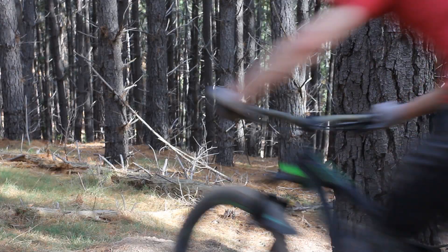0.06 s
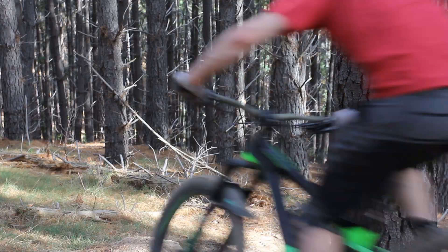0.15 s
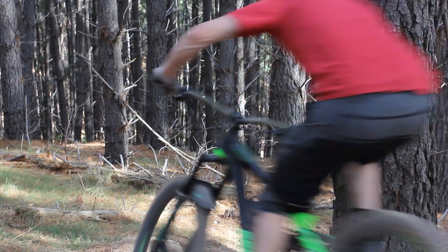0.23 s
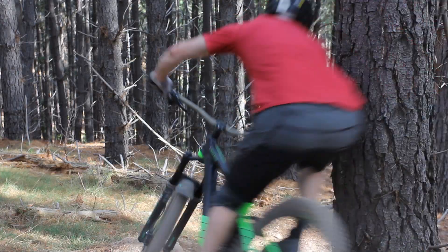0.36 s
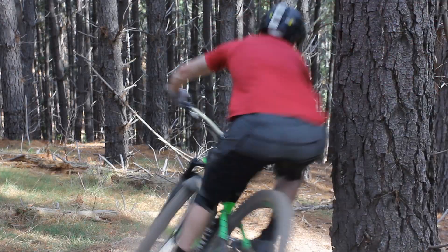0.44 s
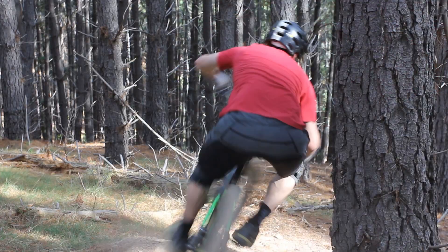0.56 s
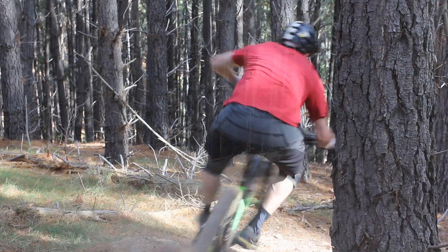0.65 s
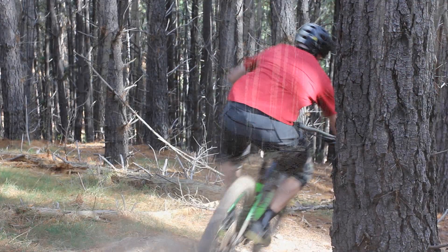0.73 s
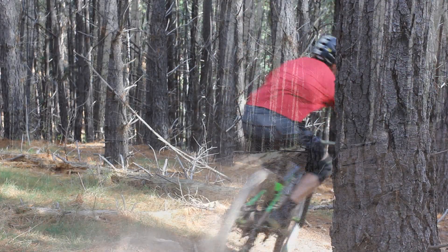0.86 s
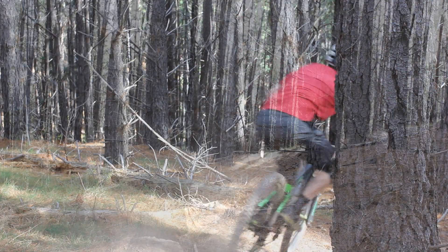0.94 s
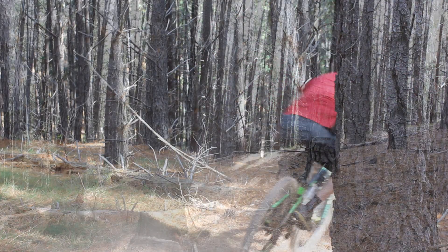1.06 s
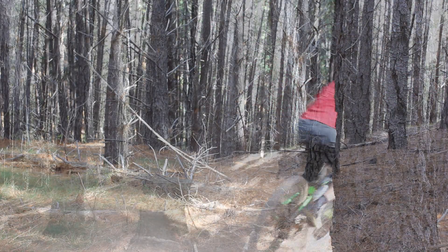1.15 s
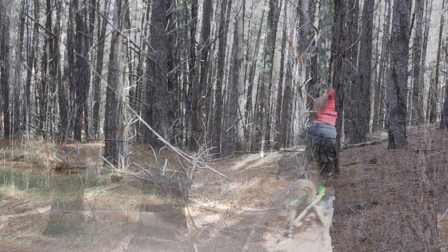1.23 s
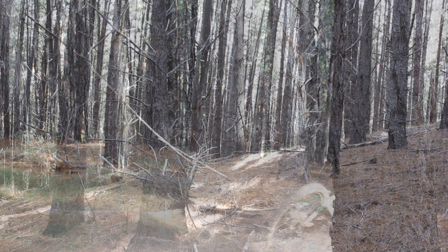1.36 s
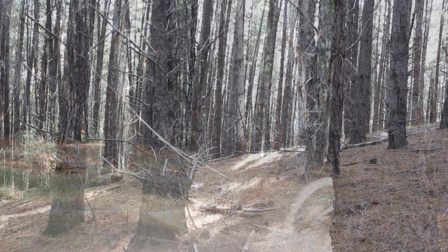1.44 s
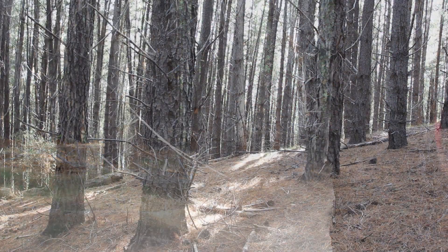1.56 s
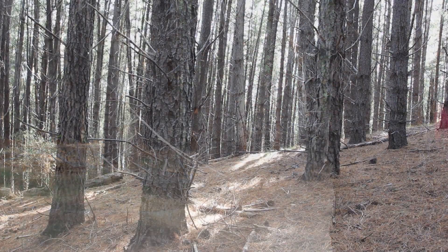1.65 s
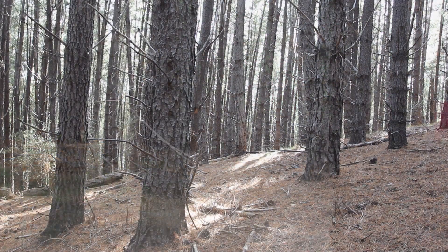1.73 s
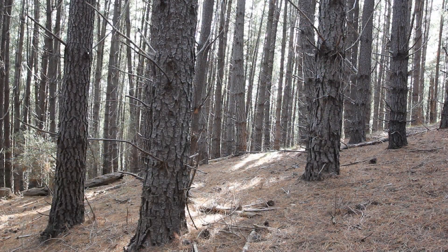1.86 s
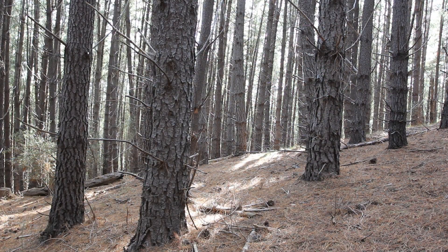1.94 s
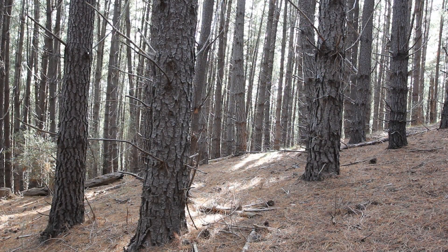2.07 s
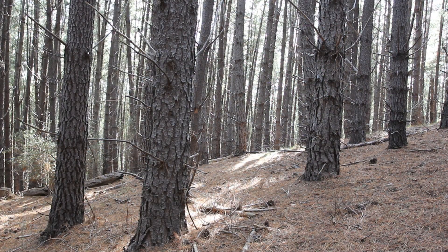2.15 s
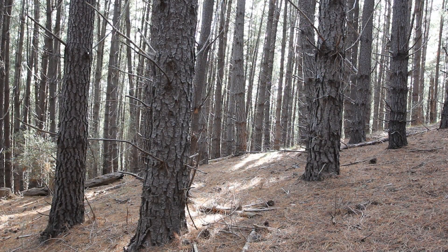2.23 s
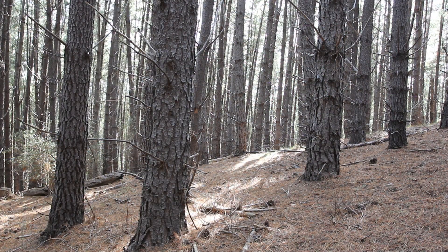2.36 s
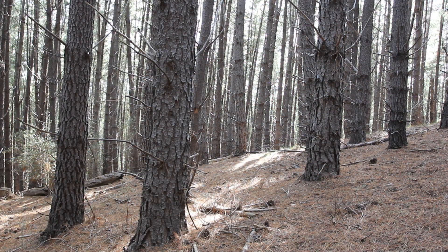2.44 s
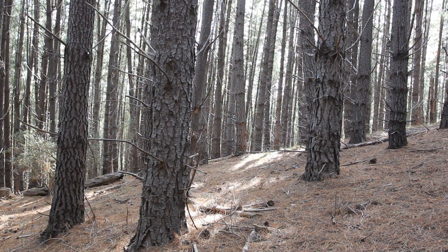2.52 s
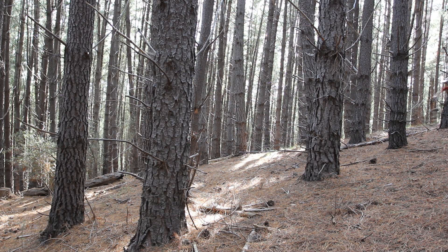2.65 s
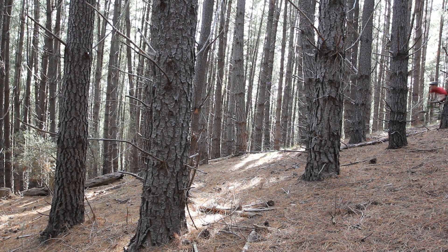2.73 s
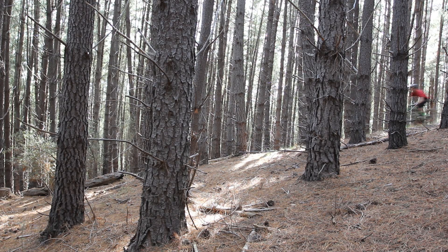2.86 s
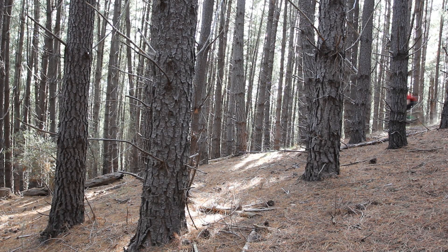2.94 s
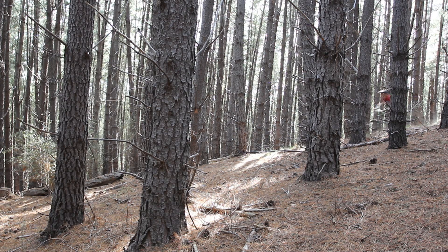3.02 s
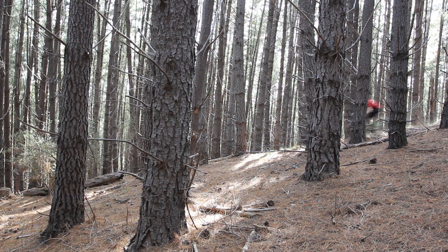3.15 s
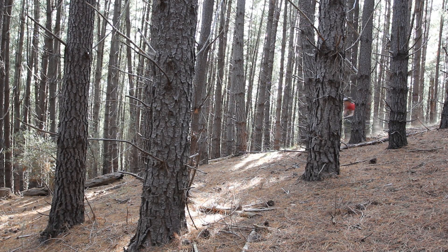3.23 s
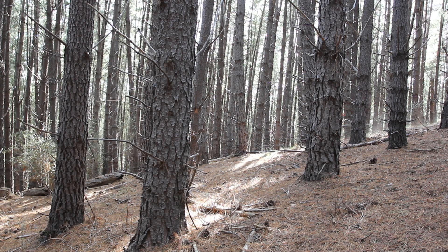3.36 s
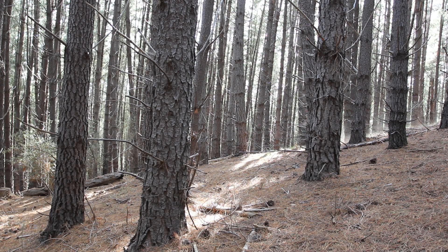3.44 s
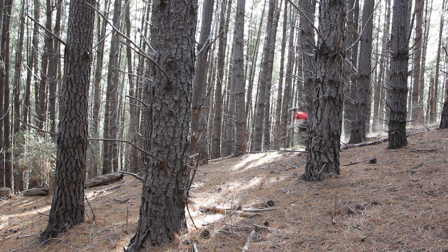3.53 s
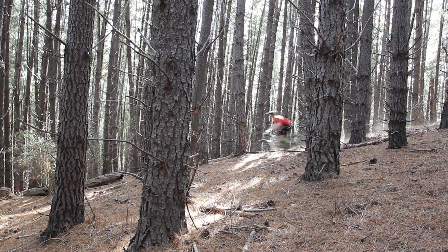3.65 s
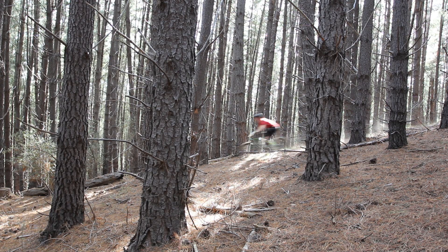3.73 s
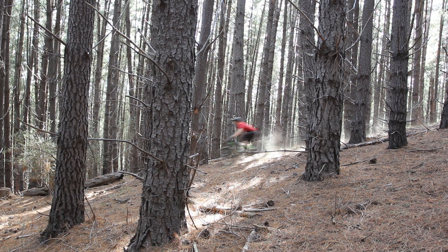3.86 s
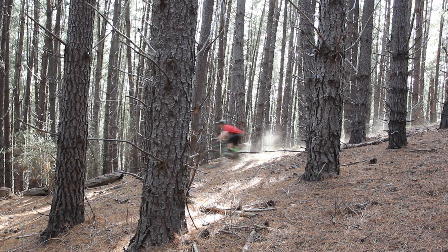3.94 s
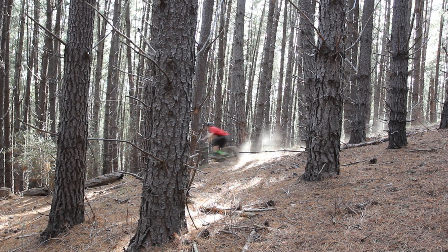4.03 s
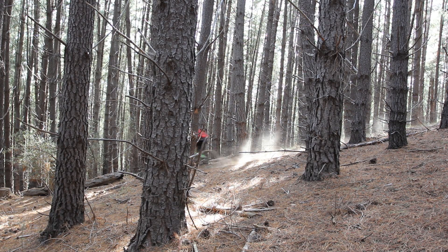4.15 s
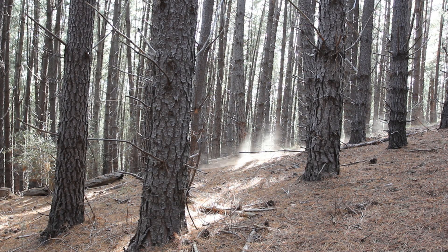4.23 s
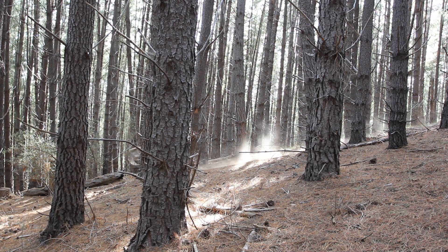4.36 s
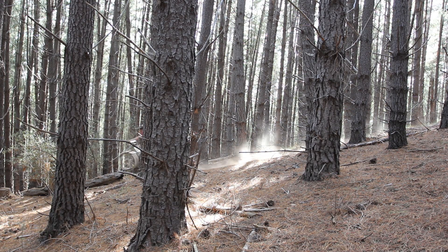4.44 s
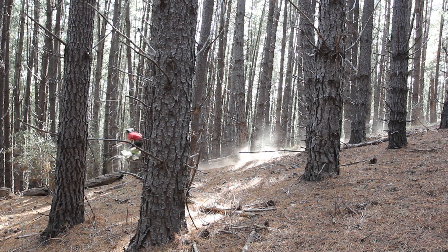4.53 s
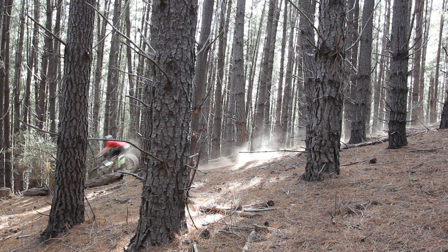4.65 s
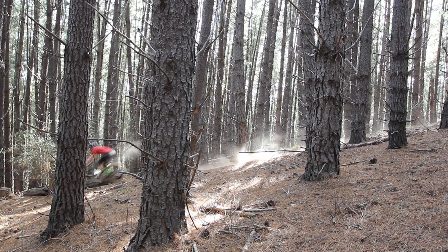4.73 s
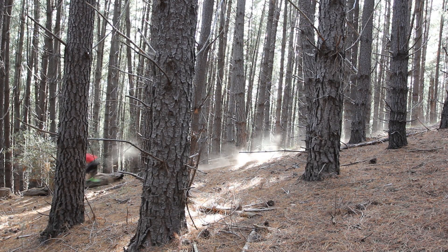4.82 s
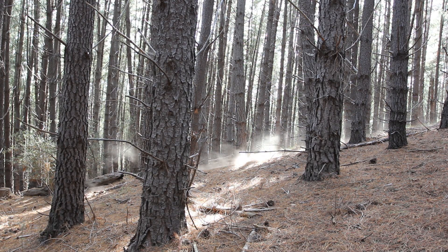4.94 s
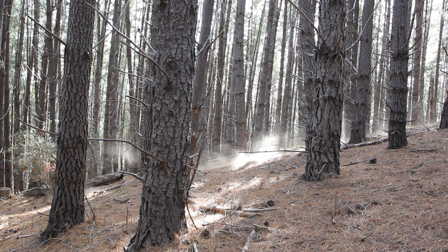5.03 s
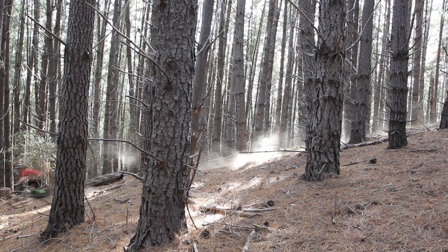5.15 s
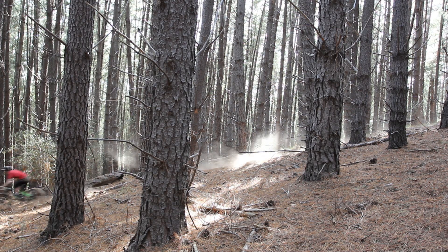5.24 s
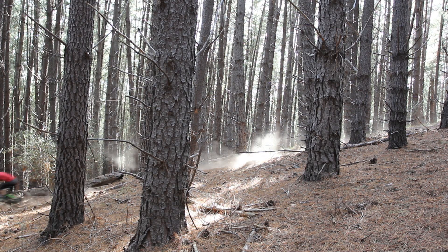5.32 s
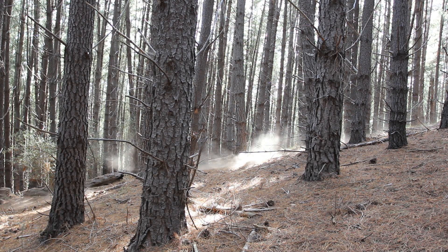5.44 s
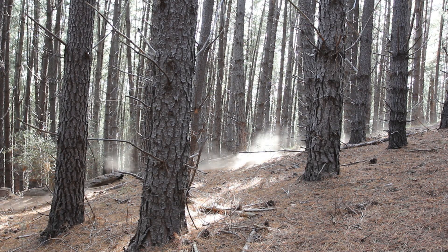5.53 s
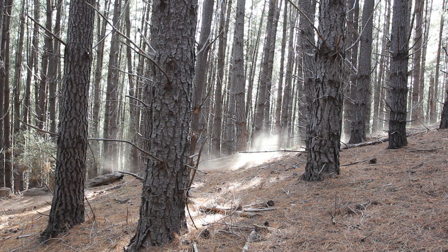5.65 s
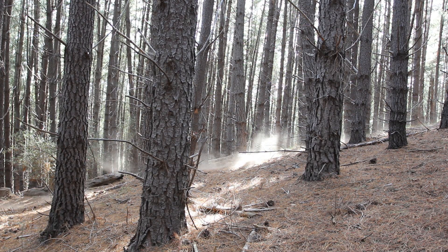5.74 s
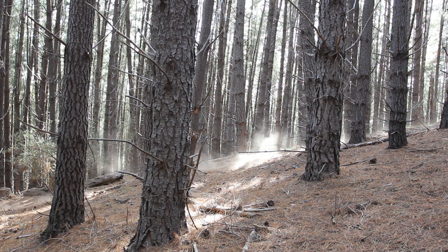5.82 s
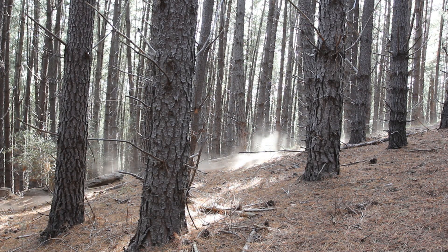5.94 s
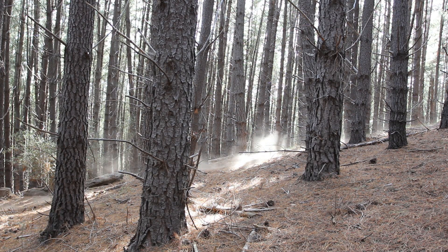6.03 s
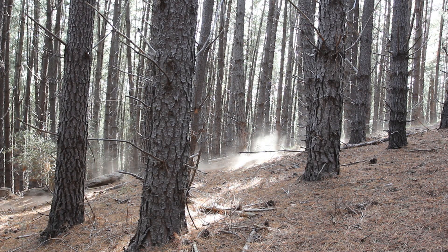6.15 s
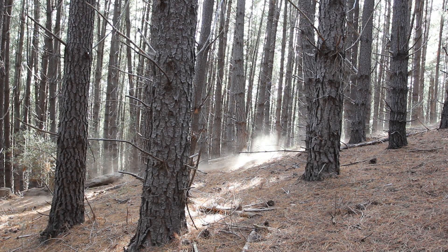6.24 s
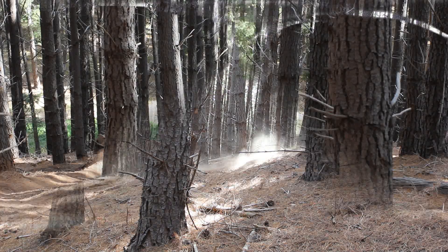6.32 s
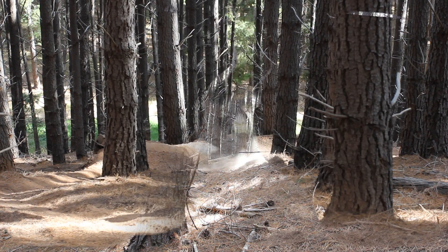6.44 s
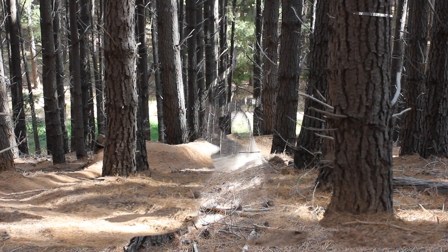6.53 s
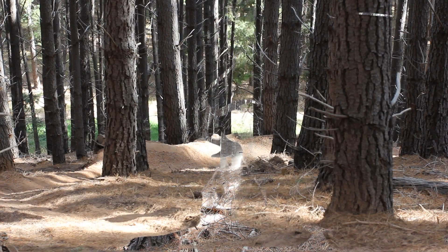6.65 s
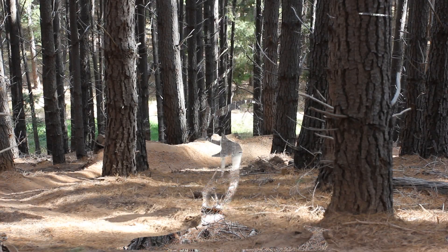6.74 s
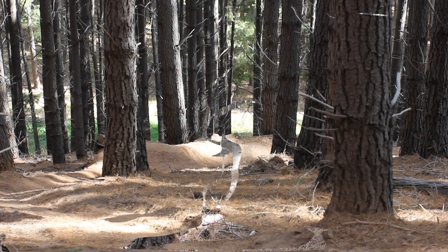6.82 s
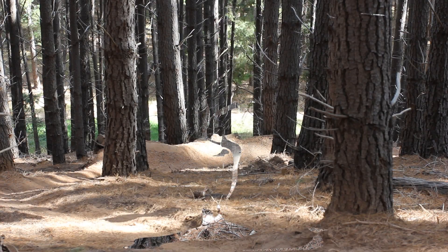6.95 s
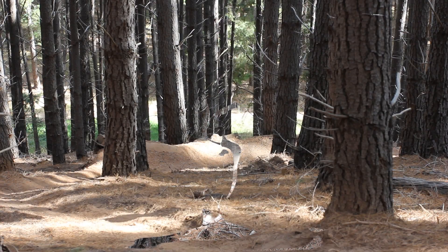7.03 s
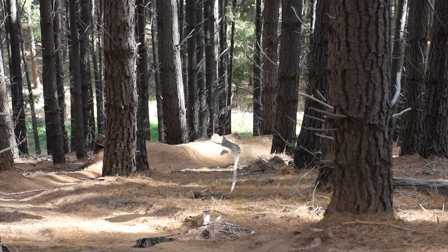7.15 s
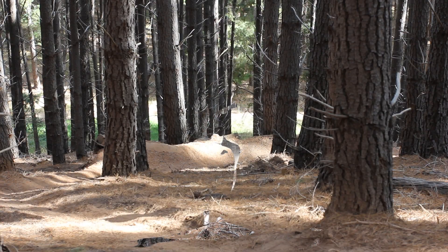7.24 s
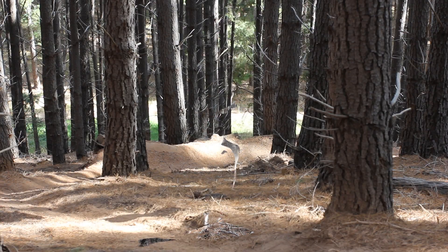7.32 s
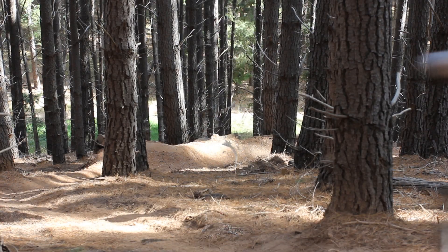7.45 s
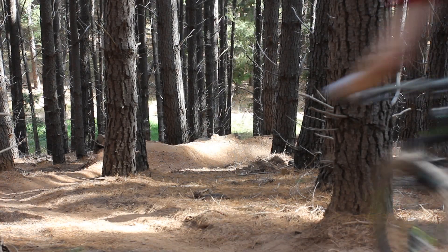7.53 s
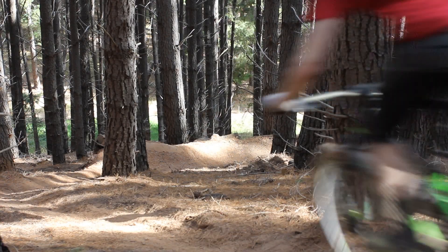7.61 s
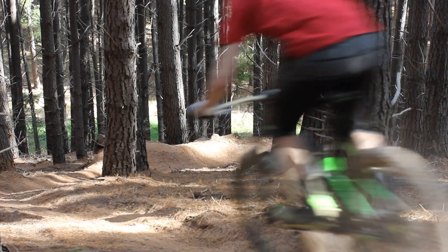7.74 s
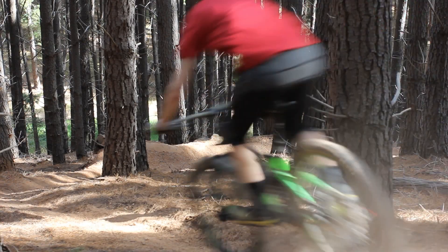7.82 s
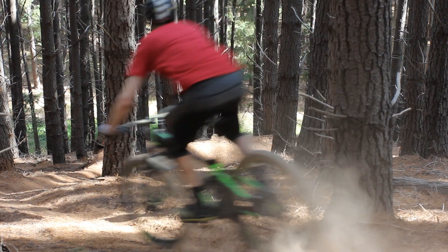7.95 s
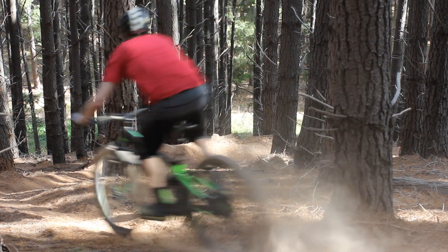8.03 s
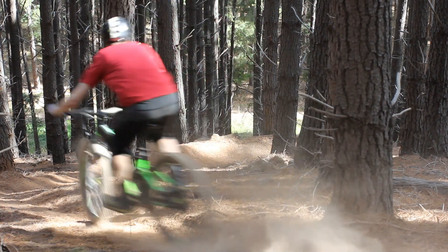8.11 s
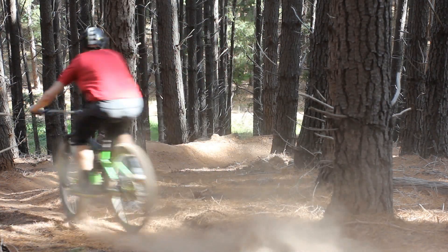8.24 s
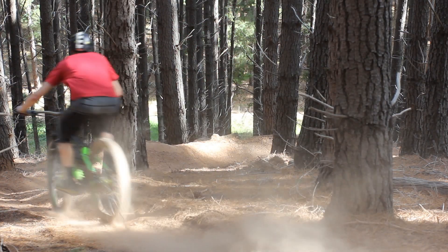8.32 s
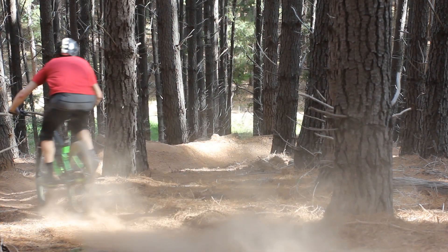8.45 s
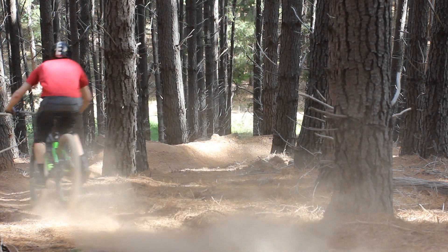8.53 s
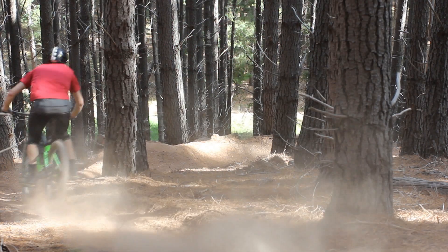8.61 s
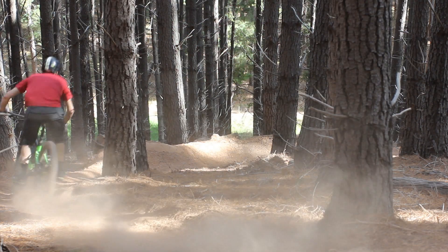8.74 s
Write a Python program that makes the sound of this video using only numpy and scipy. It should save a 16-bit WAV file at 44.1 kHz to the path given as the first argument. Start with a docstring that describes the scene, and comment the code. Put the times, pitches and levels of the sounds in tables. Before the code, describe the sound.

Knobby tyres crunch and spray grit through a dusty forest in three passes, near, distant and near, with hub clicks, chain rattles and light wind.

```python
"""Mountain bike on a dusty forest trail

Heard from three spots joined by hard cuts: near, far, near again. Tyres roll as grainy noise and crunch into
roots and stones in bursts of grit; pebbles ping as damped tones. Chain slaps are noise through resonances,
and the freehub ticks by ringing its shell at every tooth, mostly while the rider coasts. Wind noise and bumps
reach the microphone over a steady forest hush; the trunks return a short diffuse echo of the knocks.
"""
import sys
import numpy as np
from scipy import signal
from scipy.fft import rfft, irfft, next_fast_len
from scipy.io import wavfile
from scipy.ndimage import uniform_filter1d, map_coordinates

SR = 44100
rng = np.random.default_rng(int(sys.argv[2]) if len(sys.argv) > 2 else 0)


def wav_record(signal):
    """Record a signal, one row per channel, as 16-bit PCM in the file named by sys.argv[1]."""
    frames = np.transpose(np.atleast_2d(signal))
    bounded = np.clip(frames, -1, 1)
    # unit amplitude maps onto the largest positive 16-bit level
    quanta = np.round(bounded * 32767).astype(np.int16)
    wavfile.write(sys.argv[1], SR, quanta)


N = 387198  # length in samples


def amp(db):
    """Amplitude factor of a level in dB."""
    return 10 ** (np.asarray(db) / 20)


def unit(x):
    """Scales a signal to rms 1."""
    return x / np.sqrt(np.mean(x ** 2) + 1e-20)


def along(points, hz):
    """Reads (pitch_hz, value) points on a log frequency axis."""
    point_hz, values = np.transpose(points)
    return np.interp(np.log(hz + 1), np.log(point_hz + 1), values)


def curve(rows):
    """One value per sample from (start_s, value) rows."""
    return np.interp(np.arange(N) / SR, *np.transpose(rows))


def wobble(rate):
    """A smooth random curve with rate knots a second."""
    knots = rng.standard_normal(int(N * rate / SR) + 4)
    return map_coordinates(knots, [np.arange(N) * rate / SR])


def filtered(x, response):
    """Multiplies the spectrum of x by a response of frequency."""
    size = next_fast_len(len(x) + 4096)
    spectrum = rfft(x, size) * response(np.fft.rfftfreq(size, 1 / SR))
    return irfft(spectrum, size)[:len(x)]


def resonant(x, modes):
    """Passes x through parallel (pitch_hz, width_hz, level_db) resonances of alternating sign."""
    def response(f):
        total = 0
        for k, (centre, width, db) in enumerate(modes):
            band = 1j * f * width / (centre * centre - f * f + 1j * f * width)
            total = total + (-1) ** k * amp(db) * band
        return total
    return filtered(x, response)


def grainy(spectrum, lumps_db, rate, patchy_db):
    """Noise of rms 1 whose level jumps about, rate times a second, as grains give way; patches of pitch stand out."""
    lumpy_noise = amp(lumps_db * wobble(rate)) * rng.standard_normal(N)
    z = signal.stft(lumpy_noise, nperseg=256)[2]
    field = uniform_filter1d(rng.standard_normal(z.shape), size=2, axis=0)
    field = uniform_filter1d(field, size=5, axis=1)
    noise = signal.istft(z * amp(patchy_db * unit(field)), nperseg=256)[1][:N]
    return unit(filtered(noise, lambda hz: amp(along(spectrum, hz))))


def add(track, s, sound):
    """Mixes a sound into the track at s seconds."""
    part = track[round(s * SR):][:len(sound)]
    part += sound[:len(part)]


def burst(t60, rise, length=.12):
    """White noise that swells for rise seconds and dies away by 60 dB in t60 seconds."""
    t = np.arange(round(length * SR)) / SR
    decay = amp(-60 * np.maximum(t - rise, 0) / t60)
    shape = np.minimum(t / max(rise, 1e-4), 1) * decay
    noise = shape * rng.standard_normal(len(t))
    return noise * np.linalg.norm(shape) / np.linalg.norm(noise)


# Hard cuts from the near spot to the far one and back: start_s
SPOT_CUTS = [1.278, 6.949]
# Tyres rolling on dirt, jumping in level at each cut: start_s, level_db (relative)
ROLL_LEVEL = [(0.0, -26), (0.09, -19), (0.2, -28), (0.235, -19), (0.272, -26), (0.32, -20), (0.53, -26),
              (0.6, -33), (0.871, -41), (0.879, -29.5), (0.93, -27), (1.275, -31), (1.285, -55.5),
              (3.4, -47), (3.44, -39), (3.55, -35.5), (3.81, -37.5), (4.01, -31), (4.65, -51.5),
              (4.84, -55), (4.865, -41), (5.07, -36.5), (5.5, -45), (5.55, -41), (5.64, -42), (5.69, -35.5),
              (6.0, -41.5), (6.68, -49), (6.72, -38), (6.942, -41), (6.956, -35), (7.21, -24), (7.5, -31),
              (7.59, -38), (7.63, -28), (7.76, -29), (7.8, -36), (7.845, -16), (7.895, -16.5), (7.93, -32),
              (8.1, -33), (8.3, -37), (8.5, -35), (8.57, -30.5), (8.71, -37), (8.735, -30), (8.78, -34)]
# Colour of the roll close to the microphone: pitch_hz, level_db (per Hz, relative)
ROLL_NEAR_COLOUR = [(35, -58), (60, -29.5), (169, -8), (210, -8.5), (275, -3.5), (520, -4), (810, 0.5),
                    (1180, -4.5), (1600, -5), (2390, -10), (2860, -10), (7000, -37), (9100, -63),
                    (15400, -120)]
# Colour of the roll at a distance: pitch_hz, level_db (per Hz, relative)
ROLL_FAR_COLOUR = [(59, -50), (100, -9), (270, -8), (400, -11), (560, -9), (900, -1), (1100, -5.5),
                   (1980, -3.5), (7000, -25.5), (9100, -56), (15400, -120)]


def tyre_roll(lumps):
    """Knobby tyres press on dirt that gives way in lumps; distance blends the grains into a smoother rush."""
    s = np.arange(N) / SR
    far = (s > SPOT_CUTS[0]) & (s < SPOT_CUTS[1])
    far_rush = grainy(ROLL_FAR_COLOUR, lumps_db=1.5, rate=280, patchy_db=2.5)
    near_rush = grainy(ROLL_NEAR_COLOUR, lumps_db=2.8, rate=300, patchy_db=3.5)
    rush = np.where(far, far_rush, near_rush)
    return amp(curve(ROLL_LEVEL) - 0.49 + 1.1 * lumps) * rush


# Grit sprayed by the knobs: start_s, level_db (relative)
SPRAY_LEVEL = [(0.0, -35), (0.84, -43), (1.275, -41), (1.285, -60), (3.243, -59), (3.65, -49), (3.9, -40),
               (4.606, -55), (4.84, -53), (4.999, -38.5), (5.9, -47), (6.12, -55), (6.942, -51),
               (6.956, -40.5), (7.7, -35), (7.81, -41), (7.866, -32), (7.93, -43), (8.15, -44), (8.2, -36),
               (8.53, -46), (8.59, -31), (8.7, -40), (8.774, -38)]
# Colour of the flying grit: pitch_hz, level_db (per Hz, relative)
GRIT_COLOUR = [(800, -24), (2000, -0.5), (3500, -1), (6000, -5.5), (10000, -13), (16000, -24)]


def flying_grit(lumps):
    """Grit thrown by the knobs is a brighter grainy noise, swayed by the same lumps of dirt as the roll."""
    return amp(curve(SPRAY_LEVEL) + 1.0 + 1.0 * lumps) * grainy(GRIT_COLOUR, lumps_db=3.0, rate=400, patchy_db=2.5)


# A tyre strikes a stone or root: start_s (of the peak), level_db (relative rms), pitch_hz, fall_s (over 5 dB)
STONE_STRIKES = [(0.209, -11, 900, .008), (0.324, -6, 1770, .0026), (0.336, -6, 1410, .003),
                 (0.358, -12, 1500, .0015), (0.376, -18, 2080, .014), (0.516, -15, 2000, .012),
                 (0.955, -23, 1500, .0012), (0.999, -12, 3000, .0015), (1.206, -20, 2010, .0075),
                 (1.22, -16, 2070, .0058), (2.78, -35, 2000, .0028), (3.416, -30, 1310, .0025),
                 (3.848, -27, 1300, .012), (3.989, -20, 970, .0096), (4.904, -28.5, 1830, .0016),
                 (4.991, -27.5, 1690, .0018), (5.66, -29, 900, .004), (5.742, -26, 1300, .006),
                 (5.871, -26.5, 1280, .007), (6.95, -16.5, 1150, .0045), (7.211, -14.5, 870, .0013),
                 (7.317, -11.5, 710, .0044), (7.548, -5, 705, .002), (7.907, -7.5, 744, .0023),
                 (7.971, -14.5, 1380, .011), (8.029, -16.5, 850, .012), (8.081, -20, 1900, .0042),
                 (8.124, -18, 850, .002), (8.177, -22.5, 1350, .0061), (8.337, -20.5, 1820, .0017),
                 (8.556, -21, 1430, .014), (8.722, -19.5, 890, .013)]
# A tyre ploughs into loose dirt: start_s (of the peak), level_db (relative rms), pitch_hz, rise_s (over 5 dB)
DIRT_SWELLS = [(0.095, -16.5, 900, .039), (0.245, -18.5, 1340, .019), (0.297, -14, 1040, .011),
               (0.419, -20, 815, .007), (0.454, -20, 1660, .009), (0.954, -28, 1110, .015),
               (1.039, -25, 1100, .028), (1.071, -20, 810, .02), (3.735, -31, 900, .006),
               (3.927, -27, 1340, .01), (4.045, -29, 900, .012), (4.106, -29, 2070, .008),
               (6.137, -38, 1200, .008), (5.68, -28, 1310, .005), (7.544, -16, 1100, .012),
               (7.615, -16, 2180, .006), (7.684, -17.5, 1030, .0048), (7.752, -15.5, 1500, .011),
               (7.778, -22, 900, .01), (7.85, -13.5, 850, .0075), (8.459, -30, 1010, .02)]
# Tyre casing resonance: pitch_hz, width_hz, level_db
CASING_MODES = [(1110, 3700, 0)]
STRIKE_RISE_S, SWELL_FALL_S = .0013, .006  # each over 5 dB


def crunches():
    """Each crunch is a swell of grains through the tyre casing, with one stone or stick loudest."""
    out = np.zeros(N)
    t = np.arange(-SR // 20, SR // 8) / SR  # the peak is at t = 0
    rows = [(s, db, hz, STRIKE_RISE_S, fall) for s, db, hz, fall in STONE_STRIKES]
    rows += [(s, db, hz, rise, SWELL_FALL_S) for s, db, hz, rise in DIRT_SWELLS]
    for s, db, hz, rise, fall in rows:
        swell = amp(-5 * np.where(t < 0, (t / rise) ** 2, t / fall))
        sizes = np.repeat(rng.standard_normal(len(t)), 70)[:len(t)]  # each grain lasts 70 samples
        grit = amp(3.5 * sizes) * rng.standard_normal(len(t))
        stone = resonant(grit, [(hz, 0.39 * hz, 0), (1200, 1700, -9), (280, 200, -6)])
        through_casing = resonant(resonant(stone, CASING_MODES), CASING_MODES)
        sound = swell * through_casing
        add(out, s + t[0], amp(db - 0.76) * np.linalg.norm(swell) * sound / np.linalg.norm(sound))
    return out


# The rider coasts: first_s, middle_s, last_s (ticks), teeth passing (count),
# first_level_db, middle_level_db, last_level_db (relative)
COAST_RUNS = [(0.569, .689, 0.817, 23, -24, -28, -27), (0.836, .863, 0.898, 3, -24, -25, -25),
              (1.014, 1.05, 1.077, 3, -23, -30, -30), (1.439, 1.62, 1.824, 27, -47, -44, -45),
              (2.614, 2.65, 2.686, 5, -52, -50, -49), (2.884, 3.016, 3.137, 22, -46, -40, -46),
              (3.263, 3.316, 3.374, 9, -38, -39, -43), (4.177, 4.272, 4.356, 17, -32, -32, -39),
              (4.369, 4.482, 4.606, 20, -43, -44, -46), (4.624, 4.791, 4.943, 24, -37, -31, -33),
              (5.032, 5.118, 5.201, 14, -37, -38, -42), (5.225, 5.246, 5.267, 5, -35, -34, -35),
              (5.297, 5.457, 5.633, 28, -33, -31, -37), (5.77, 5.797, 5.828, 3, -36, -38, -38),
              (5.909, 5.939, 5.981, 6, -35, -39, -39), (6.007, 6.05, 6.093, 5, -40, -41, -40),
              (6.79, 6.84, 6.894, 6, -43, -46, -45), (7.013, 7.136, 7.283, 19, -37, -31, -30),
              (7.296, 7.388, 7.483, 14, -29, -25.5, -24), (7.572, 7.669, 7.777, 12, -30, -27, -25),
              (8.044, 8.094, 8.157, 7, -35, -32, -35), (8.202, 8.303, 8.465, 19, -27, -27, -28.5)]
# Single teeth slip while the rider pedals: start_s, level_db (relative)
PEDAL_SLIPS = [(0.015, -26), (0.064, -24), (0.139, -21), (0.178, -18), (0.954, -30), (2.833, -43),
               (3.702, -41), (3.73, -40), (3.757, -40), (3.775, -43), (3.799, -40), (3.81, -40),
               (3.838, -40), (3.862, -41), (3.884, -37), (3.899, -40), (3.934, -40), (3.969, -36),
               (3.977, -37), (4.009, -32), (4.035, -37), (4.068, -33), (4.083, -35), (4.094, -33),
               (4.114, -34), (4.124, -32), (4.143, -31), (4.154, -32), (4.16, -26), (5.278, -29),
               (5.887, -37), (6.172, -38), (6.2, -45), (6.411, -45), (6.444, -39), (6.487, -35),
               (6.509, -32), (6.546, -31), (6.584, -32), (6.605, -29), (6.638, -32.5), (6.929, -42),
               (7.508, -25), (7.843, -22), (8.177, -25), (8.593, -24), (8.631, -21), (8.758, -30)]
SLOW_ENDS = .22  # the ticks slow by this share where the pedals stop and catch up again


def ticks():
    """Times and levels of every tooth that a pawl drops over, bent through the middle tick of each coast."""
    rows = [np.array(PEDAL_SLIPS)]
    for first, middle, last, teeth, *level_db in COAST_RUNS:
        u = np.linspace(0, 1, round(teeth) + 1)
        # weights of a parabola through the first, middle and last tick
        bend = np.array([(1 - u) * (1 - 2 * u), 4 * u * (1 - u), u * (2 * u - 1)]).T
        slowing = (last - first) * SLOW_ENDS * np.sin(2 * np.pi * u) / (2 * np.pi)
        s = bend @ [first, middle, last] + slowing
        rows.append(np.transpose([s, bend @ level_db]))
    return np.concatenate(rows).T


# Ringing modes of the hub shell: pitch_hz, width_hz, level_db (added to each drop's own strength)
SHELL_MODES = [(2750, 170, 5.5), (3850, 400, -1), (5200, 1400, -6), (6700, 900, -4.5), (8900, 480, 2.5),
               (10600, 2200, -5.5), (13200, 2200, -14), (15100, 650, -13)]
# The hub's low modes beam sideways and swell when the wheel is seen side-on: start_s, level_db
SIDE_ON_SWELL = [(0, -8), (1.28, -8), (4.79, -3), (4.86, 4), (5, -2), (5.38, 0), (5.44, 5), (5.53, 4),
                 (5.6, -6), (8.78, -3)]
BEAMED_HZ = 4500  # modes below this beam sideways
PAWL_DB, BUZZ_T60_S = 9, .024  # the drop itself over the start of the buzz that follows it


def freehub():
    """A pawl drops at every tooth, unevenly; each drop rings the shell's modes at new strengths."""
    s, tick_db = ticks()
    chance = rng.standard_normal((len(s), 2 + len(SHELL_MODES)))
    times = s - .0012 + 0.00046 * chance[:, 0]
    levels = tick_db + 1.2 * chance[:, 1]
    beam_db = np.interp(times, *np.transpose(SIDE_ON_SWELL))
    loss = amp(-60 / SR / BUZZ_T60_S)  # per sample
    out = np.zeros(N)
    for mode, share in zip(SHELL_MODES, chance[:, 2:].T):
        strength = levels + 4.5 + 2.6 * share + beam_db * (mode[0] < BEAMED_HZ)
        # faint ticks are far, and air dulls them
        strength -= .012 * np.maximum(-30 - levels, 0) * mode[0] / 1000
        drops = np.bincount(np.round(times * SR).astype(int), amp(strength), N)
        buzz = signal.lfilter([1], [1, -loss], drops) * rng.standard_normal(N)
        out += resonant(amp(PAWL_DB) * drops + buzz, [mode])
    return out


# Chain slaps on the frame: start_s, level_db (relative)
CHAIN_SLAPS = [(0.3726, 3.5), (0.3875, 4), (0.5152, -4), (0.562, -17), (0.9976, -15), (1.2, -15),
               (1.2171, -6), (2.2383, -27), (3.856, -24), (4.068, -21), (4.1589, -15), (4.9886, -11),
               (5.224, -23), (5.2769, -13), (5.312, -20), (5.66, -26), (5.678, -22), (5.7404, -16),
               (5.873, -22), (6.695, -24), (6.7176, -14.5), (6.9486, -9.5), (6.9654, -11), (7.6784, -1.5),
               (7.947, -16), (8.174, -9), (8.1928, -9), (8.5525, -9), (8.59, -15), (8.632, -15),
               (8.7205, -13), (8.757, -19)]
# Resonances of the slapping chain: pitch_hz, width_hz, level_db
CHAIN_MODES = [(1910, 380, 2.5), (3700, 150, 9), (3910, 150, 9), (4470, 350, 2.5), (5600, 500, -2),
               (7130, 400, -2.5), (9300, 1700, -10), (12600, 1500, -20)]
RATTLE_T60_S = .027


def slaps():
    """Chain links hit the stay: a brief rattle of noise through resonances."""
    blows = np.zeros(N)
    for s, db in CHAIN_SLAPS:
        add(blows, s, amp(db - 4) * burst(RATTLE_T60_S, rise=0.00046))
    return resonant(blows, CHAIN_MODES)


# Pebbles off spokes and frame: start_s, level_db (before the soft start), pitch_hz, t60_s
PEBBLE_PINGS = [(0.998, -8, 1550, .014), (3.886, -32, 5850, .04), (8.6, -31, 4680, .2),
                (8.489, -4, 3100, 0.011), (8.488, -20, 1540, 0.031), (8.506, -23.5, 3800, 0.034),
                (8.508, -19, 1404, 0.082), (8.552, -20, 1670, .06), (8.725, -34, 10140, 0.064),
                (8.756, -42, 10100, 0.082)]


def pings():
    """Pebbles ring spokes and frame as damped single tones with a soft start."""
    out, t = np.zeros(N), np.arange(SR // 4) / SR
    for s, db, hz, t60 in PEBBLE_PINGS:
        envelope = amp(db - 60 * t / t60) * (1 - np.exp(-t / 0.00083))
        add(out, s, envelope * np.sin(2 * np.pi * hz * t))
    return out


# Diffuse echo off the trunks, shorter towards the treble: pitch_hz, t60_s
TRUNK_DECAY = [(300, 0.48), (2000, 0.13), (10000, 0.058)]


def trunks(x):
    """Trunks scatter sound into a decaying noise tail, soonest lost in the treble; it ends at each cut."""
    hz, t, z = signal.stft(rng.standard_normal(SR // 3), SR, nperseg=256)
    decay = amp(-60 * t / along(TRUNK_DECAY, hz)[:, None])
    tail = signal.istft(z * decay, SR, nperseg=256)[1]
    tail = np.pad(tail / np.linalg.norm(tail), (120, 0))  # the echo starts 120 samples late
    spots = np.split(x, np.round(np.array(SPOT_CUTS) * SR).astype(int))
    return np.concatenate([signal.fftconvolve(spot, tail)[:len(spot)] for spot in spots])


# Wind on the microphone: start_s, level_db (relative)
WIND_LEVEL = [(0.0, -65), (1.275, -65), (1.285, -78), (2.075, -54), (2.572, -72), (2.987, -51),
              (3.233, -60), (4.8, -52), (6.942, -64), (6.956, -59), (7.5, -46), (8.1, -54), (8.774, -55)]
# Colour of the wind: pitch_hz, level_db (per Hz, relative)
WIND_COLOUR = [(20, -27), (45, -14.5), (70, -7), (130, -9.5), (250, -13), (500, -60)]


def wind():
    """Moving air presses on the microphone as a low, slowly lumpy noise."""
    return amp(curve(WIND_LEVEL) + 0.5) * grainy(WIND_COLOUR, lumps_db=5.5, rate=14, patchy_db=1.5)


# Wind bumps on the microphone, mostly at the far spot: start_s, level_db (relative), pitch_hz
WIND_BUMPS = [(2.04, -43, 90), (2.19, -43, 110), (2.62, -45, 80), (2.958, -43, 67.3), (3.131, -32, 103),
              (3.973, -41, 150), (4.524, -28, 135), (4.796, -35, 72.7), (4.814, -40, 53.8),
              (5.539, -34.5, 73.4), (7.869, -25, 148.5)]


def bumps():
    """A gust pushes the diaphragm: a low sine that swells and dies within hundredths of a second."""
    out, t = np.zeros(N), np.arange(round(.08 * SR)) / SR
    for s, db, hz in WIND_BUMPS:
        push = (t / 0.0078) * np.exp(-t / 0.0044)
        add(out, s, amp(db + 14) * np.sin(2 * np.pi * hz * t) * push)
    return out


# Colour of the steady forest hush: pitch_hz, level_db (per Hz, relative)
FOREST_COLOUR = [(59, -58), (100, -22), (300, -13), (480, -7), (2580, -19.5), (9210, -24), (16000, -38)]
FOREST_DB = -52  # rms


def forest_hush():
    """The forest around the trail is a faint noise of steady level."""
    return amp(FOREST_DB) * grainy(FOREST_COLOUR, lumps_db=1.5, rate=30, patchy_db=1.5)


def scene():
    """Knocks and their echo over the roll, the grit, the wind and the hush."""
    lumps = wobble(25)  # the dirt under both roll and grit
    knocks = crunches() + freehub() + slaps() + pings()
    echo = amp(-14) * trunks(knocks)
    bed = tyre_roll(lumps) + flying_grit(lumps) + wind() + forest_hush()
    return (knocks + echo + bed + bumps())[None]


TOP_HZ = 15900  # band limit


def record(dry):
    """Peaks clip just below full scale; then nothing is kept above the band limit."""
    clipped = np.clip(dry[0], -.97, .97)
    return filtered(clipped, lambda hz: hz < TOP_HZ)[None]


dry = scene()
out = record(dry)
wav_record(out)
```